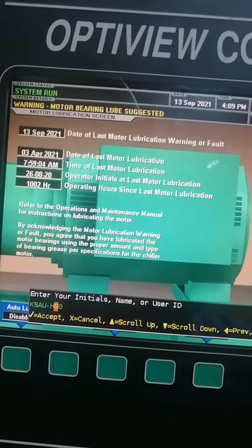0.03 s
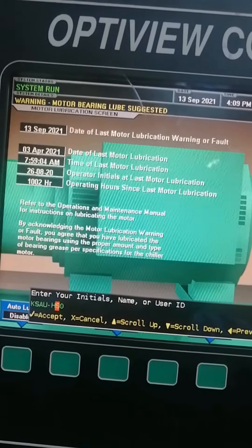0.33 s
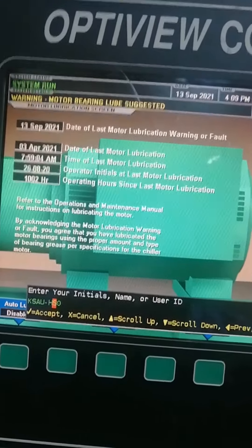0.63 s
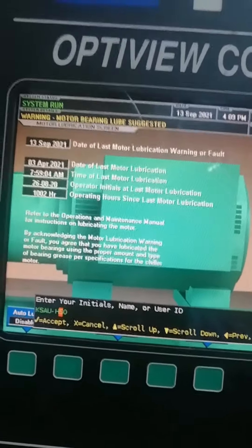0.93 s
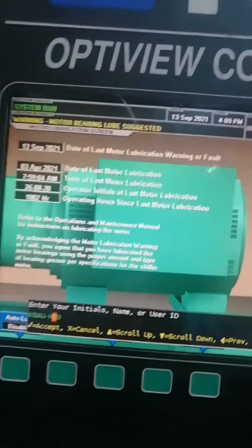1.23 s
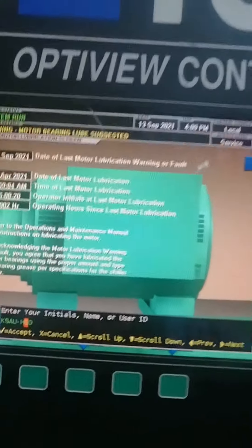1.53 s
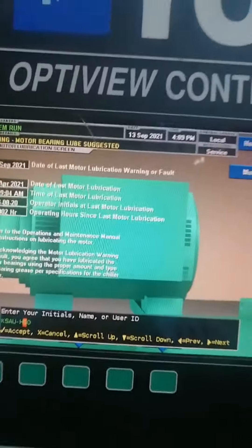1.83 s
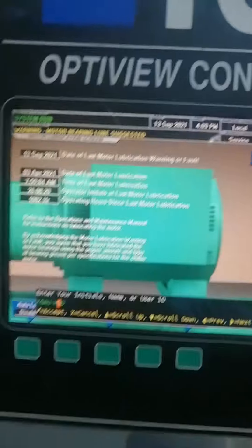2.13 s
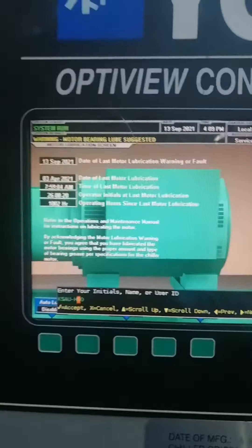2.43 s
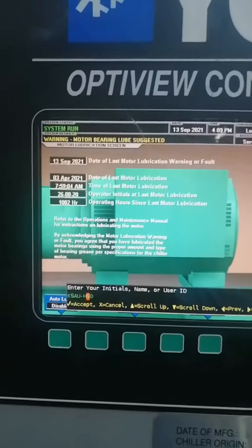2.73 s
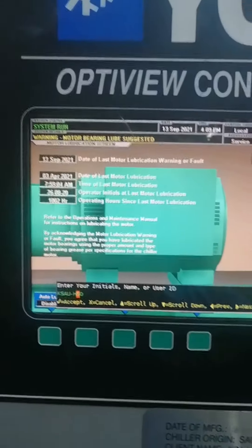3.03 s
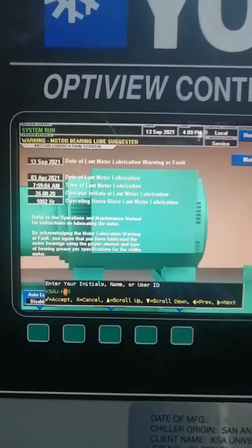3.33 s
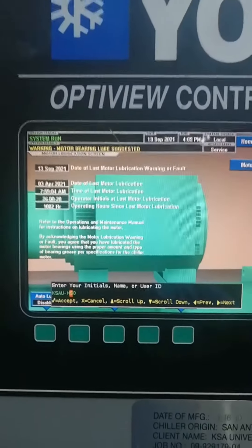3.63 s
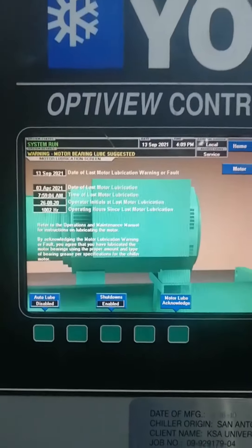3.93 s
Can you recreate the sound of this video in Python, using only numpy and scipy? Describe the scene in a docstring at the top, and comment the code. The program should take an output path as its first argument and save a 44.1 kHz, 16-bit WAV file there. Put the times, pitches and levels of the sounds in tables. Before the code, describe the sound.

A large chiller motor whines steadily over a low hum and rushing gas.

```python
"""The motor of a large water chiller whines in a plant room, heard at its control panel.
Its variable-speed drive excites combs of tones, one supply frequency apart, around multiples of the
switching rate. They swell and fade as a hand-held microphone drifts through standing waves.
Beneath them lie mains hum and the throb of the shaft beating against the supply. The compressor adds
a wavering blade tone and a turbulent rush of gas; a thin, high whistle comes and goes."""
import sys
import numpy as np
from scipy.fft import rfft, irfft, next_fast_len
from scipy.io import wavfile
from scipy.ndimage import map_coordinates

SR = 44100
rng = np.random.default_rng(int(sys.argv[2]) if len(sys.argv) > 2 else 0)


def persist_wave(psi):
    """Save psi, clipped to +-1, as 16-bit WAV."""
    counts = np.round(np.clip(psi, -1, 1) * 32767).astype(np.int16)
    wavfile.write(sys.argv[1], SR, np.atleast_2d(counts).T)


N = 176400
TIME = np.arange(N) / SR
FROM_MIDDLE_S = TIME - N / SR / 2

SWITCH_HZ, SUPPLY_HZ, MAINS_HZ, SLIP_HZ = 2385.6, 59.77, 119.97, 0.735
BLADE_HZ, WHISTLE_HZ, BAND_LIMIT_HZ = 1219, 11470, 15200

# Standing waves of the six main drive tones: t/s, left level/dB, right level/dB, left phase lead/rad
LOW_WHINE = [(0.0, -40.1, -21.3, 2.3), (0.39, -37.1, -34.7, 1.0), (0.61, -44.1, -24.1, -0.6),
             (0.84, -37.2, -21.7, 2.5), (1.21, -39.2, -34.2, 1.1), (1.63, -35.9, -20.2, 0.4),
             (1.89, -44.8, -26.9, 1.3), (2.01, -39.3, -26.8, 2.2), (2.77, -37.2, -23.6, -0.6),
             (3.0, -52.5, -24.2, -1.5), (3.32, -36.0, -27.0, 0.7), (3.63, -46.3, -33.3, -1.8),
             (4.0, -35.6, -41.1, -3.0)]
MID_WHINE = [(0.0, -25.6, -37.2, -1.4), (0.42, -24.2, -20.3, -0.9), (0.79, -29.4, -39.8, -0.5),
             (0.83, -27.1, -39.4, -2.5), (1.07, -24.8, -28.7, -2.5), (1.33, -23.4, -30.0, -1.6),
             (1.5, -25.8, -37.5, -2.0), (1.62, -26.7, -30.6, -2.5), (1.88, -21.7, -28.5, -2.6),
             (2.41, -26.0, -27.1, -1.3), (2.81, -39.4, -32.9, -0.7), (3.01, -31.3, -27.1, -0.3),
             (3.36, -27.7, -33.1, 0.3), (3.55, -35.6, -36.3, 0.6), (3.67, -31.9, -28.1, 0.9),
             (4.0, -31.7, -24.4, 1.8)]
HIGH_WHINE = [(0.0, -33.8, -43.7, 1.2), (0.24, -43.4, -27.4, 1.3), (0.41, -33.3, -25.6, 1.8),
              (0.72, -34.2, -38.7, 2.1), (0.8, -34.6, -53.8, 3.2), (0.84, -36.8, -36.9, 5.5),
              (1.08, -35.1, -22.8, 7.3), (1.32, -30.0, -23.4, 7.9), (1.62, -35.4, -38.5, 7.8),
              (2.0, -32.8, -23.5, 7.5), (2.43, -35.7, -34.4, 5.7), (2.89, -36.8, -26.6, 5.6),
              (3.13, -36.3, -30.7, 7.2), (3.3, -28.8, -36.4, 7.0), (4.0, -32.8, -33.4, 7.2)]
OCTAVE_WHINE = [(0.0, -44.3, -35.0, -1.6), (0.36, -45.8, -37.9, -1.6), (0.49, -37.5, -40.1, -0.9),
                (0.67, -49.2, -34.9, -1.8), (0.8, -37.5, -39.0, 0.3), (1.2, -52.1, -41.2, -3.3),
                (1.41, -45.4, -34.8, -8.1), (1.57, -59.3, -42.4, -7.2), (1.8, -35.4, -34.9, -5.9),
                (2.16, -29.4, -45.0, -7.6), (2.44, -39.1, -35.7, -5.0), (2.64, -36.6, -39.3, -4.3),
                (2.77, -41.2, -39.6, -6.6), (2.85, -62.3, -36.0, -4.0), (3.01, -36.7, -42.6, -5.3),
                (3.25, -45.9, -41.6, -6.3), (3.73, -35.4, -39.0, -4.9), (3.86, -62.3, -38.5, -5.4),
                (4.0, -41.3, -36.1, -4.3)]
THIN_WHINE = [(0.0, -53, -59, -1.0), (0.76, -62, -56, -1.2), (0.9, -56, -50, 0.4), (1.5, -47, -54, 0.6),
              (1.78, -48.5, -54, 0.3), (1.87, -58, -56, 0.0), (1.98, -45.5, -49, -0.4),
              (2.14, -61, -56, -2.7), (2.48, -51, -55, -1.8), (2.91, -60, -60, -1.7),
              (3.39, -53, -58, -2.2), (4.0, -51.5, -51.5, -1.7)]
TOP_WHINE = [(0.0, -47.5, -76.7, -2.5), (0.12, -49.6, -55.3, -0.8), (0.74, -59.8, -59.8, -1.4),
             (0.85, -64.3, -49.7, 0.4), (0.95, -44.8, -56.2, -1.1), (1.04, -53.6, -51.5, -0.6),
             (1.52, -48.9, -58.6, -2.3), (1.56, -57.5, -54.5, -1.1), (1.75, -57.0, -50.8, -4.8),
             (2.28, -55.7, -53.7, -5.5), (2.51, -47.7, -50.6, -5.9), (3.31, -53.0, -50.6, -6.8),
             (3.59, -71.3, -62.9, -9.4), (4.0, -54.6, -59.4, -15.8)]
# Main drive tones: switching multiple, offset/supply steps, standing-wave table
WHINES = [(1, -3, LOW_WHINE), (1, -1, MID_WHINE), (1, 1, HIGH_WHINE), (2, 0, OCTAVE_WHINE),
          (3, -3, THIN_WHINE), (4, 0, TOP_WHINE)]
# Weaker sidebands, keyed by switching multiple: offset/supply steps, level/dB
SIDEBANDS = {1: [(-12, -49.5), (-4, -53), (0, -50), (3, -49), (5, -51.5), (6, -46.5), (7, -51.5),
             (9, -46.5), (10, -52), (11, -49), (12, -53), (15, -52), (22, -56)], 2: [(-4, -56), (-2, -51),
             (2, -52), (6, -53), (12, -57)], 3: [(-5, -63), (-1, -57), (1, -60)], 4: [(2, -66)]}
# Envelope of the faint tones on the remaining steps: f/Hz, level per tone/dB
COMB_ENVELOPE = [(1400, -62), (1900, -58), (2400, -60), (3200, -64), (3500, -69), (4000, -71),
                 (4800, -65.5), (5600, -75), (6400, -64.5), (7200, -78), (8000, -74), (11000, -93)]
# Casing and pump tones: f/Hz, level/dB
CASING_TONES = [(140, -43), (221, -43), (304, -48.5), (406, -55), (479, -53.5), (509, -48.5), (711, -54.5)]
# Swells of the whistle: onset t/s, duration/s, level at the crest/dB
WHISTLE_SWELLS = [(-0.1, 0.42, -63), (2.08, 0.34, -58), (2.39, 0.2, -64), (3.25, 0.38, -63)]
# Spectrum of gas and cooling air: f/Hz, level in a 1 Hz band/dB
RUSH_SPECTRUM = [(24, -72.5), (72, -62), (94, -57.5), (160, -57.5), (220, -56.5), (320, -60), (450, -63.5),
                 (530, -62), (720, -66.5), (900, -62.5), (1100, -58.5), (1220, -52.5), (1350, -61.5),
                 (1550, -68.5), (1900, -73), (2400, -66.5), (2800, -70.5), (3300, -73), (4000, -82.5),
                 (4400, -80.5), (4800, -74), (5000, -78.5), (5400, -75.5), (6200, -84), (7100, -78.5),
                 (7800, -87.5), (9000, -89.5), (9600, -85.5), (10800, -97.5), (13800, -99), (14500, -92),
                 (15200, -98)]
# Coherence of the rush: f/Hz, left-right correlation
COHERENCE = [(40, 0.77), (160, 0.95), (250, 0.89), (450, 0.32), (900, 0.38), (1200, 0.17), (1900, 0.0094)]
# Stereo balance: f/Hz, left minus right level/dB
BALANCE = [(200, 0.3), (380, -4), (850, 2), (1500, -2), (2400, -3), (4500, -1), (6200, -3), (7800, 5.5),
           (13500, -3), (14800, -6)]


def motor_whine():
    """Standing waves: near a node a drive tone dips sharply and its phase swings on that side."""
    tremor_db, tremor_rad, drift_rad = 0.6, 0.05, 0.66  # hand tremor is per switching multiple
    out = np.zeros((2, N))
    # Shared phases lock the tones loosely, so neighbours beat at twice the supply rate and buzz.
    switching, supply = running_phase(SWITCH_HZ), running_phase(SUPPLY_HZ)
    for multiple, step, waves in WHINES:
        times, left_db, right_db, lead = np.transpose(waves)
        left, right, lead = [np.interp(TIME, times, c) for c in (amp(left_db), amp(right_db), lead)]
        gain = np.array([left, right]) * amp(tremor_db * multiple * wobble(12))
        right_share = right ** 2 / (left ** 2 + right ** 2)
        swing = np.cumsum(np.gradient(lead) * right_share)  # the weaker side swings more
        phase = multiple * (switching + tremor_rad * wobble(3.4, channels=1)) + step * supply
        phase += drift_rad * wobble(2.59, channels=1)
        out += np.sqrt(2) * gain * np.sin(phase + np.array([swing, swing - lead]))
    return out


def sideband_comb():
    """Modulation: weaker sidebands lie one supply step apart around each switching multiple."""
    out = np.zeros((2, N))
    for multiple, sidebands in SIDEBANDS.items():
        levels_db = dict(sidebands)
        main_steps = [step for m, step, _ in WHINES if m == multiple]
        for step in range(-14, 26):
            hz = multiple * SWITCH_HZ + step * SUPPLY_HZ
            if step in levels_db:
                out += room_tone(hz, levels_db[step], rate=3.5 * np.sqrt(multiple), depth=0.6)
            elif step not in main_steps:
                level_db = along(COMB_ENVELOPE, hz) + 0.73 * rng.standard_normal((2, 1))
                gain = amp(level_db) * pan(along(BALANCE, hz))
                out += np.sqrt(2) * gain * np.sin([running_phase(hz), running_phase(hz)])
    return out


def hum_and_throb():
    """Beats: the shaft slips just behind the supply and throbs against it, under the mains hum."""
    supply = running_phase(SUPPLY_HZ)
    slip = 2 * np.pi * SLIP_HZ * (TIME - 0.36)  # in phase at 0.36 s
    throb = amp(-41) * np.sin(supply) + amp(-46) * np.sin(supply - slip)
    mains = amp(-28 + 0.53 * wobble(3.89, channels=1)) * np.sin(running_phase(MAINS_HZ))
    return np.sqrt(2) * (throb * pan(-1.2) + mains * pan(2.5))


def compressor(rise_db_per_s=0.7, pulse_db=2.3):
    """Amplitude modulation: a growing blade tone pulses with the gas flow, over small casing tones."""
    swell_db = rise_db_per_s * FROM_MIDDLE_S + pulse_db * wobble(24, channels=1)
    blade = amp(swell_db) * room_tone(BLADE_HZ, db=-33, rate=18, depth=0.46)
    casing = sum(room_tone(hz, db, rate=6.94, depth=0.3) for hz, db in CASING_TONES)
    return blade + casing


def whistle(waver_db=3.5, waver_hz=22):
    """Random modulation: a thin tone on the left wavers in level and pitch within half-sine swells."""
    swells = sum(amp(db) * np.sin(np.pi * np.clip((TIME - onset) / duration, 0, 1))
                 for onset, duration, db in WHISTLE_SWELLS)
    gain = swells * amp(waver_db * wobble(24))
    hz = WHISTLE_HZ + waver_hz * wobble(24, channels=1)
    return np.sqrt(2) * gain * pan(5.4) * np.sin(2 * np.pi * np.cumsum(hz) / SR)


def gas_rush():
    """Turbulence: gas and air radiate broadband noise, coherent in the bass and diffuse in the treble."""
    def mid_side_response(hz):
        mix_angle = np.arccos(along(COHERENCE, hz)) / 2
        return amp(along(RUSH_SPECTRUM, hz)) * [np.cos(mix_angle), np.sin(mix_angle)]

    white = np.sqrt(SR / 2) * rng.standard_normal((2, N))  # unit power per hertz
    mid, side = filtered(white, mid_side_response)
    stereo = filtered(np.array([mid + side, mid - side]), lambda hz: pan(along(BALANCE, hz)))
    return stereo * amp(0.1 * wobble(2.2))


def room_tone(hz, db, rate, depth):
    """Interference: a tone adds to reflections of relative size depth, shifting rate times a second."""
    spread_rad_per_hz = 0.00057  # path difference between the two microphones
    phase = running_phase(hz) + spread_rad_per_hz * hz * rng.uniform(-1.02, 1, (2, 1))
    in_phase = (1 + depth * wobble(rate)) * np.sin(phase)
    quadrature = depth * wobble(rate) * np.cos(phase)
    tone = in_phase + quadrature
    return amp(db) * pan(along(BALANCE, hz)) * tone / tone.std(axis=1, keepdims=True)


def leaving_panel_shadow(x, rise_db_per_s=0.2):
    """Acoustic shadow: the midrange grows as the microphone backs off and the panel shields less."""
    midrange = filtered(x, lambda hz: (hz > 279) & (hz < 1540))
    return x + midrange * (amp(rise_db_per_s * FROM_MIDDLE_S) - 1)


def amp(db):
    """Amplitude ratio of a level in decibels."""
    return 10 ** (np.asarray(db) / 20)


def pan(left_db):
    """Left and right gains for a level difference."""
    return amp(np.array([[.5], [-.5]]) * left_db)


def along(points, hz):
    """Interpolation of (f/Hz, value) points on a logarithmic frequency axis."""
    frequencies, values = np.transpose(points)
    return np.interp(np.log(hz + 1), np.log(frequencies + 1), values)


def running_phase(hz):
    """Phase of a steady tone, advancing uniformly from a random start."""
    return 2 * np.pi * (hz * TIME + rng.random())


def wobble(rate, channels=2):
    """Smooth random fluctuation: splines through rate knots a second."""
    times = np.linspace(0, N / SR, 600)
    knots = rng.standard_normal((channels, 512))
    curves = [map_coordinates(row, [times * rate], mode="wrap") for row in knots]
    return np.array([np.interp(TIME, times, curve) for curve in curves])


def filtered(x, response):
    """Linear filtering: the spectrum of x is multiplied by a frequency response."""
    size = next_fast_len(N + SR // 4)
    hz = np.fft.rfftfreq(size, 1 / SR)
    return irfft(rfft(x, size) * response(hz), size)[..., :N]


def scene():
    """Superposition: the pressures of all the sources add."""
    tones = motor_whine() + sideband_comb() + hum_and_throb() + whistle()
    return tones + leaving_panel_shadow(compressor() + gas_rush())


def record(dry):
    """Band limiting: an ideal low-pass filter removes the highest treble."""
    return filtered(dry, lambda hz: hz < BAND_LIMIT_HZ)


dry = scene()
out = record(dry)
persist_wave(out)
```